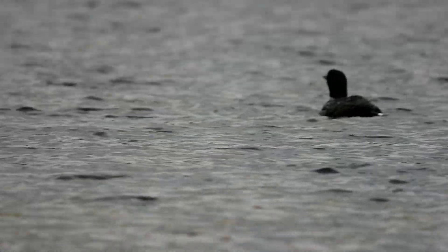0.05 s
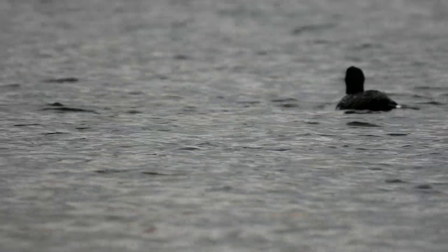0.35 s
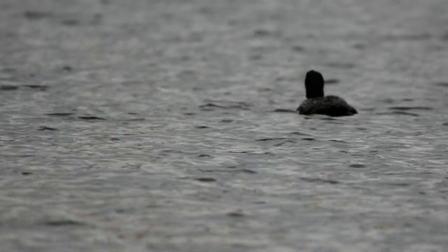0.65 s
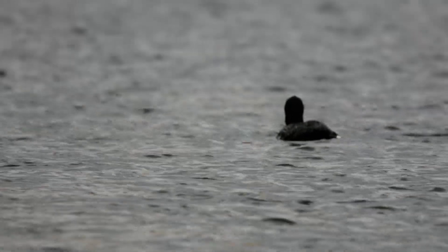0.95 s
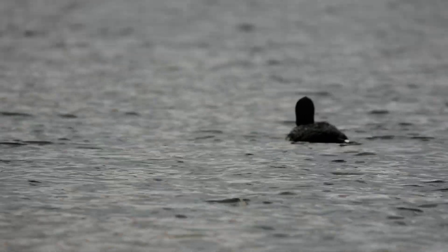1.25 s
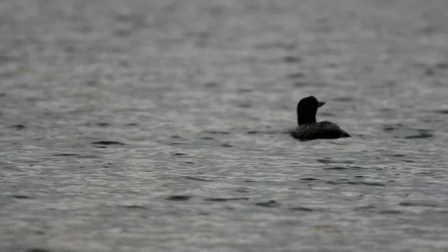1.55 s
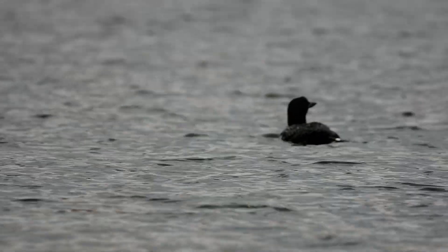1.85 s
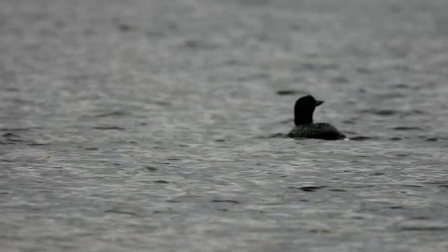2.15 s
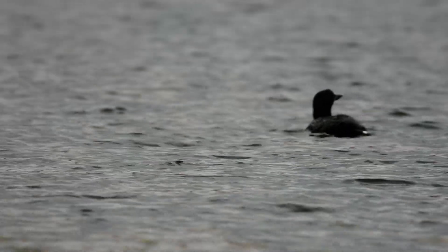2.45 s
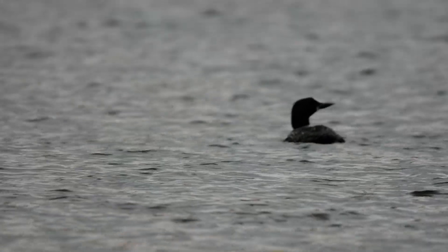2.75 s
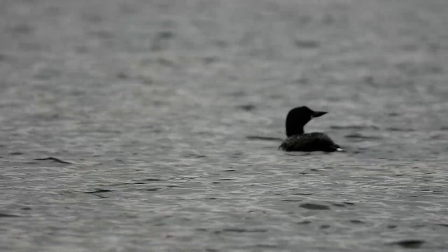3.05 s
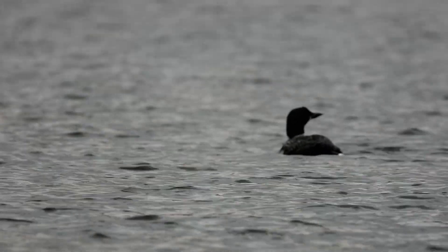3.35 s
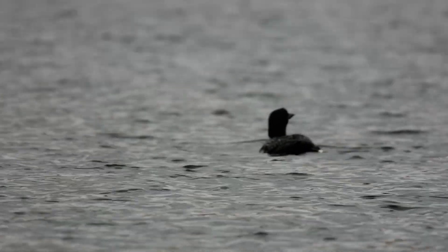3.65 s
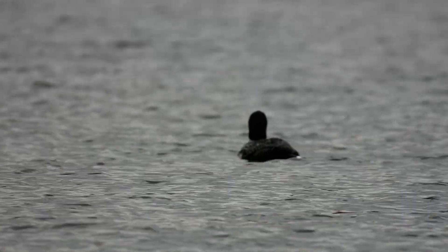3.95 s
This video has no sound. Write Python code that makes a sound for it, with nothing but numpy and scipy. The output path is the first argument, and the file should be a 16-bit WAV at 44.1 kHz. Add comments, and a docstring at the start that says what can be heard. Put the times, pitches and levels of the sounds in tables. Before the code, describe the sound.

A loon's faint wavering call carries over a lake, with wind buffeting the microphone.

```python
"""A lake: far across the water a loon gives one wavering tremolo, and the shore answers with a long echo.
Wind buffets the microphone in short puffs, then slackens. A small bird lisps thin high notes.
Close by, drips ring the bubbles they trap and spray ticks on the water.
Under it all lie hiss, a faint whine and the buzz of a camera motor."""
import sys
import numpy as np
from scipy import signal
from scipy.fft import rfft, irfft, next_fast_len
from scipy.io import wavfile
from scipy.ndimage import map_coordinates

SR = 44100
rng = np.random.default_rng(int(sys.argv[2]) if len(sys.argv) > 2 else 0)


def wav_record(signal):
    """Record a signal, one row per channel, as 16-bit PCM in the file named by sys.argv[1]."""
    frames = np.transpose(np.atleast_2d(signal))
    bounded = np.clip(frames, -1, 1)
    # unit amplitude maps onto the largest positive 16-bit level
    quanta = np.round(bounded * 32767).astype(np.int16)
    wavfile.write(sys.argv[1], SR, quanta)


N = 176400


def amp(db):
    """Decibels to gain."""
    return 10 ** (np.asarray(db) / 20)


def unit(x):
    """Scale to rms 1."""
    return x / np.sqrt(np.mean(x ** 2) + 1e-20)


def eq_gain(points, hz):
    """Gain of an EQ curve drawn through (frequency, dB) points on a log axis."""
    freqs, db = np.transpose(points)
    return amp(np.interp(np.log(hz + 1e-6), np.log(freqs), db))


def automation(points):
    """Straight ramps through (seconds, value) points, one value a sample."""
    return np.interp(np.arange(N) / SR, *np.transpose(points))


def wobble(rate, size=N):
    """A smooth random curve, rate knots a second."""
    knots = rng.standard_normal(int(size * rate / SR) + 4)
    return map_coordinates(knots, [np.arange(size) * rate / SR])


def filtered(x, gain):
    """x times a gain that depends on frequency."""
    size = next_fast_len(len(x) + 4096)
    return irfft(rfft(x, size) * gain(np.fft.rfftfreq(size, 1 / SR)), size)[:len(x)]


def noise(eq):
    """Coloured noise of rms 1."""
    return unit(filtered(rng.standard_normal(N), lambda f: eq_gain(eq, f)))


def add(out, start, x):
    """Mix x into out from start, in seconds."""
    i = round(start * SR)
    x = x[max(-i, 0):max(N - i, 0)]
    out[max(i, 0):][:len(x)] += x


def shore_echo(x, t60, swell_s):
    """The wooded shore scatters a sound into a diffuse tail that swells and dies away."""
    t = np.arange(2 * SR) / SR
    tail = rng.standard_normal(len(t)) * amp(-60 * t / t60) * (1 - np.exp(-(t / swell_s) ** 2))
    return signal.fftconvolve(x, tail / np.linalg.norm(tail))[:N]


def hiss_and_whine():
    """A bed of steady hiss with a faint whine wavering around 2 kHz."""
    # Colour of the hiss. Each row: frequency in Hz, relative level in dB.
    hiss_eq = [(300, 4.5), (1100, 5.5), (1600, 1.5), (4000, -1), (4550, 3.5), (5400, -2.5), (9200, -7),
               (10500, -11), (13500, -14.5), (15700, -19)]
    # Fader ride of the whine. Each row: time in seconds, level in dB.
    whine_ride = [(0, -82), (.4, -69), (.75, -76.5), (.85, -63), (.96, -74)]
    phase = 2 * np.pi * np.cumsum(2000 + 16 * wobble(60)) / SR
    hiss = amp(-55.5) * noise(hiss_eq)
    whine = amp(automation(whine_ride) + 2.5 * wobble(9)) * np.sqrt(2) * np.sin(phase)
    return hiss + whine


def camera_buzz():
    """A camera motor ticks over in tiny falling chirps, sounding for half of each cycle."""
    rate_hz, top_hz, fall_hz = 53.76, 5120, 551.5
    cycle = np.arange(N) / SR * rate_hz % 1
    progress = np.minimum(2 * cycle, 1)
    phase = 2 * np.pi * np.cumsum(top_hz - fall_hz * progress ** 3 + 45 * wobble(250)) / SR
    return amp(-59.5) * np.sin(np.pi * progress) * np.sin(phase)


def wind_turbulence():
    """Lumpy rumble between the puffs, with a higher flutter that grows faster as the wind rises."""
    # Fader ride of the wind. Each row: time in seconds, level in dB.
    wind_ride = [(0, -34), (.55, -42), (.66, -32.5), (1.08, -31), (1.2, -33), (1.95, -36.5), (2.15, -46.5),
                 (2.65, -42), (3.3, -46), (3.45, -50), (3.6, -42.5), (4, -42)]
    # Colours of the two layers. Each row: frequency in Hz, relative level in dB.
    rumble_eq = [(12, -41), (32, -3.5), (95, 2.5), (180, -10), (300, -26.5), (450, -39), (900, -67)]
    flutter_eq = [(40, -25), (130, 3), (220, 1.5), (350, -10.5), (2200, -70)]
    strong_db, flutter_growth = -30, 2.11
    wind_db = automation(wind_ride)
    lumps_db = 5 * np.tanh(wobble(40))
    rumble = amp(wind_db + lumps_db) * noise(rumble_eq)
    flutter_db = strong_db + flutter_growth * (wind_db - strong_db) + 6.1 * np.tanh(wobble(60))
    return rumble + amp(flutter_db + lumps_db) * noise(flutter_eq)


def wind_puffs():
    """Each eddy is a sudden, churning push on the diaphragm; stronger, briefer ones reach higher."""
    # Eddies hitting the microphone. Each row: time in seconds, length in seconds, strength in dB.
    eddies = [(0.015, 0.013, -23.5), (0.075, 0.014, -22.5), (0.132, .009, -17.5), (0.167, 0.015, -25.5),
              (.207, 0.0093, -21.5), (0.286, 0.018, -26), (0.337, 0.0054, -27.5), (0.394, 0.011, -26.5),
              (0.441, 0.007, -24.5), (0.546, 0.021, -30), (0.656, 0.0055, -18), (0.678, 0.008, -23),
              (0.727, .006, -13), (0.742, .01, -18.5), (0.789, 0.014, -16), (0.811, .01, -22.5),
              (0.838, 0.0035, -27.5), (0.879, .0025, -26.5), (0.894, .009, -21), (0.913, 0.012, -18),
              (0.937, 0.0027, -17.5), (0.962, 0.007, -21.5), (1.006, 0.012, -15.5), (1.039, 0.009, -18.5),
              (1.088, .012, -24), (1.1078, 0.0034, -16), (1.157, 0.0024, -24), (1.216, 0.0092, -22),
              (1.278, 0.019, -15.5), (1.335, 0.0078, -21), (1.41, 0.011, -12), (1.437, .008, -20),
              (1.451, .005, -21), (1.488, 0.014, -23.5), (1.57, 0.014, -23.5), (1.639, 0.0096, -17.5),
              (1.682, .011, -22.5), (1.711, .009, -18), (1.775, .014, -20.5), (1.824, 0.0045, -20),
              (1.847, .007, -15.5), (1.908, 0.0094, -28), (2.019, 0.016, -27.5), (2.208, 0.0112, -33.5),
              (2.417, 0.042, -27), (2.628, 0.018, -28.5), (2.702, 0.0091, -34), (2.849, 0.009, -34),
              (3.009, .009, -35), (3.082, 0.02, -31), (3.323, 0.021, -28.5), (3.551, 0.0081, -30.5),
              (3.587, 0.0099, -31.5), (3.621, 0.015, -24.5), (3.662, 0.006, -29), (3.795, 0.011, -29.5),
              (3.834, 0.012, -24.5)]
    # Colour of a puff. Each row: multiple of its centre frequency, relative level in dB.
    puff_eq = [(.08, -62), (.3, -4), (.85, -4.5), (1.35, -7), (2, -10.5), (3, -22), (18, -105)]
    typical_hz, typical_db, typical_s = 157.88, -20.5, 0.010036
    db_per_octave, trim_db, rise_share = 30, 1.5, 0.46
    out, t = np.zeros(N), np.arange(-SR // 10, SR // 10) / SR
    for time, length, db in eddies:
        centre_hz = typical_hz * 2 ** ((db - typical_db) / db_per_octave) * (typical_s / length) ** 0.2016
        start_cycle = rng.random()
        churn_hz = centre_hz * np.exp(0.44 * wobble(167.9, len(t)))
        churn = np.sin(2 * np.pi * (start_cycle + np.cumsum(churn_hz) / SR))
        age = np.maximum(t / (rise_share * length) + 1.5, 0)  # in rise times
        push = (churn + 4 * rng.standard_normal(len(t))) * age * np.exp(-age)
        push = filtered(push, lambda f: eq_gain(puff_eq, f / centre_hz))
        energy = np.hypot(length, 0.011) * SR / 2  # even the briefest puff keeps some weight
        add(out, time + t[0], amp(db + trim_db) * push * np.sqrt(energy / np.sum(push ** 2)))
    return out


def drips_and_ticks():
    """Drips ring a small trapped bubble, sagging in pitch; ticks are short bursts of spray."""
    # Bubbles. Each row: start in seconds, opening pitch in Hz, level in dB, 60 dB decay in seconds.
    drips = [(1.9546, 1900, -28, 0.024), (2.254, 4130, -44, 0.037), (2.27, 2360, -39.5, 0.021),
             (2.434, 1860, -46.5, 0.058), (2.612, 1340, -47.5, 0.038), (2.769, 2820, -47, .02)]
    # Spray. Each row: start in seconds, level in dB, centre in Hz, width in octaves,
    # 60 dB decay in seconds.
    ticks = [(0.2063, -43, 11300, .15, 0.0085), (1.9545, -24.5, 5960, 1, 0.0011),
             (1.9634, -43, 5060, 1, .007), (2.226, -44, 3920, .35, 0.018), (2.266, -52, 3460, 0.7, 0.07),
             (2.6136, -46.5, 7000, 0.94, 0.01), (2.703, -47, 4200, .35, 0.018),
             (2.859, -54.5, 6700, 0.28, 0.21), (3.311, -45, 9900, 0.36, 0.0077),
             (3.475, -56.5, 8300, 0.44, 0.15)]
    attack_s = 0.00006
    out, t = np.zeros(N), np.arange(SR // 10) / SR
    attack = 1 - np.exp(-t / attack_s)
    for start, hz, db, t60 in drips:
        sag = 1 - 0.332 * np.minimum(t / t60, 1)
        phase = 2 * np.pi * np.cumsum(hz * sag) / SR
        add(out, start, amp(db - 60 * t / t60) * attack * np.sin(phase))
    for start, db, hz, octaves, t60 in ticks:
        white = rng.standard_normal(len(t))
        spray = filtered(white, lambda f: np.exp(-.5 * (np.log2((f + 1) / hz) / octaves) ** 2))
        add(out, start, amp(db - 60 * t / t60) * attack * unit(spray))
    return out


def small_bird():
    """Thin whistles that dip in pitch and smear among the trees."""
    # Whistles. Each row: start and length in seconds, opening and lowest pitch in Hz, level in dB.
    lisps = [(2.565, 0.043, 8400, 7770, -51.5), (2.612, 0.031, 8400, 7930, -50),
             (2.705, .1, 8400, 7970, -57.5), (2.8, 0.039, 7840, 7700, -58.5)]
    out = np.zeros(N)
    for start, length, start_hz, low_hz, db in lisps:
        progress = np.linspace(0, 1, int(length * SR))
        hz = start_hz + (low_hz - start_hz) * np.sin(2 * progress) + 110 * wobble(312, len(progress))
        envelope = amp(db) * np.sqrt(abs(np.sin(np.pi * progress)))
        add(out, start, envelope * np.sin(2 * np.pi * np.cumsum(hz) / SR))
    return out + shore_echo(out, t60=0.76, swell_s=0.02)


def loon_note(turns, octave_db):
    """A tone and its octave, swinging smoothly between turning points with a slight tremble."""
    fade_s = 0.0067
    times, turn_hz, turn_db = np.transpose(turns)
    t, index = np.arange(N) / SR, np.arange(len(times))
    position = np.interp(t, times, index)
    eased = np.floor(position) + np.sin(np.pi / 2 * (position % 1)) ** 2
    hz, db = np.interp(eased, index, turn_hz), np.interp(eased, index, turn_db)
    phase = 2 * np.pi * np.cumsum(hz * (1 + 0.0059 * wobble(150))) / SR
    gate = np.clip(np.minimum(t - times[0], times[-1] - t) / fade_s, 0, 1)
    tone = np.sin(phase) + amp(octave_db) * np.sin(2 * phase)
    return np.sqrt(2) * gate * amp(db + wobble(81.3)) * tone


def loon():
    """A brief falling note; later a low opening breaks up into the tremolo and rings over the lake."""
    # Turning points of the voice. Each row: time in seconds, pitch in Hz, level in dB.
    fall = [(0, 999, -48.5), (.07, 860, -62)]
    opening = [(1.15, 645, -68), (1.21, 705, -56), (1.255, 625, -59), (1.305, 787, -51.5), (1.32, 805, -57)]
    tremolo = [(1.318, 1088, -48), (1.36, 864, -52), (1.412, 1165, -42.5), (1.461, 859, -54),
               (1.509, 1169, -45), (1.566, 819, -52), (1.614, 1070, -46.5), (1.685, 815, -55.5)]
    voice = loon_note(fall, octave_db=-46)
    voice += loon_note(opening, octave_db=-7.5)
    voice += loon_note(tremolo, octave_db=-46)
    return voice + amp(-6) * shore_echo(voice, t60=2.4, swell_s=0.06)


def scene():
    """Wind, birds, water and the noise bed, mixed in mono."""
    wind = wind_puffs() + wind_turbulence()
    return (wind + loon() + small_bird() + drips_and_ticks() + hiss_and_whine() + camera_buzz())[None]


def record(dry):
    """The camera keeps nothing above its band limit."""
    top_hz = 15750
    return np.array([filtered(x, lambda f: f < top_hz) for x in dry])


dry = scene()
out = record(dry)
wav_record(out)
```